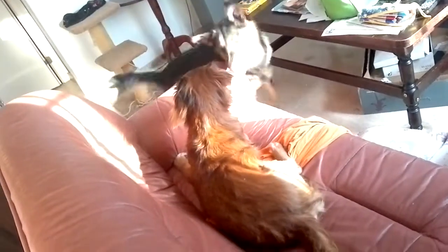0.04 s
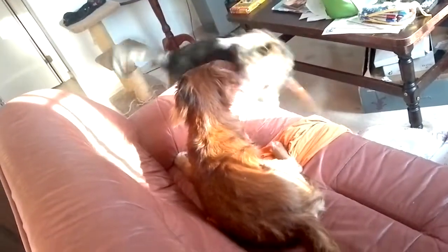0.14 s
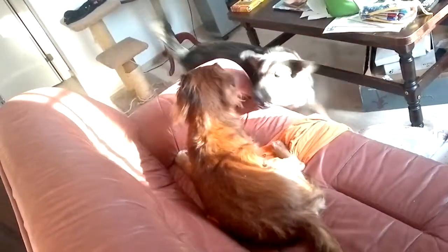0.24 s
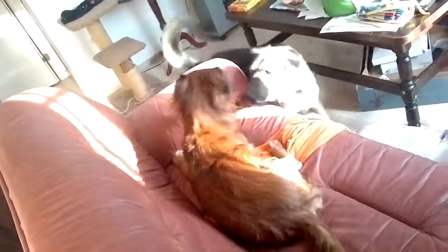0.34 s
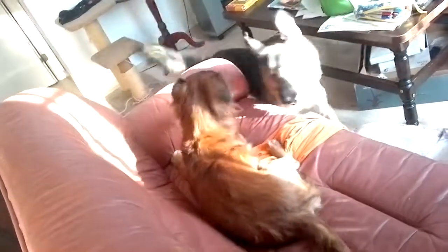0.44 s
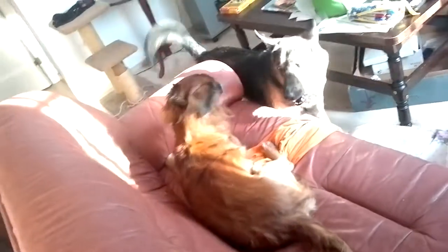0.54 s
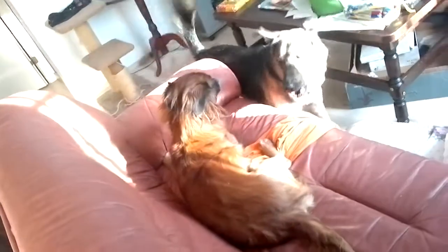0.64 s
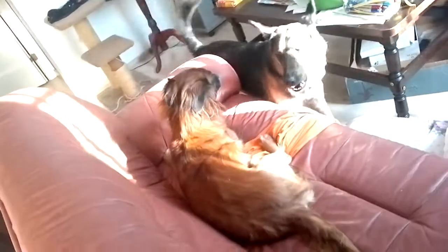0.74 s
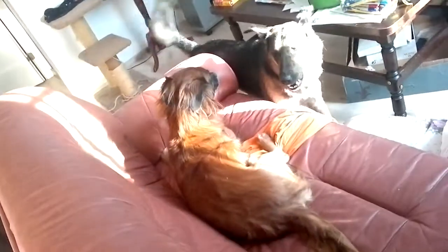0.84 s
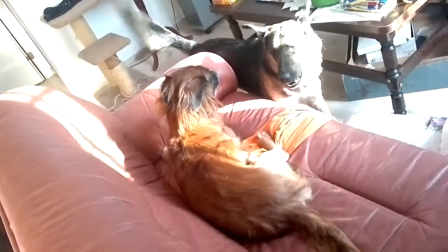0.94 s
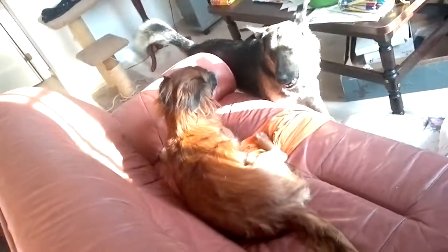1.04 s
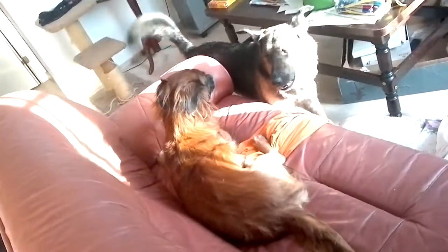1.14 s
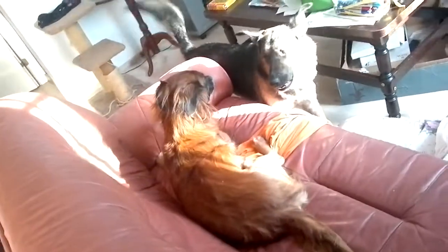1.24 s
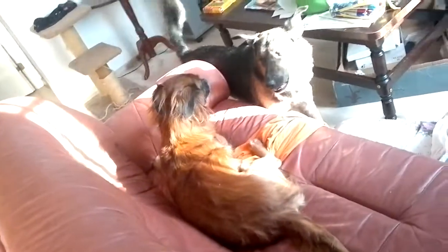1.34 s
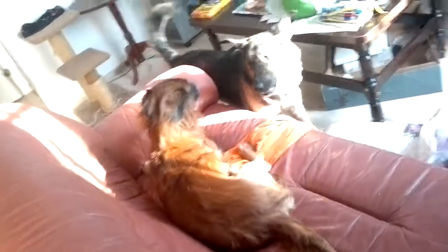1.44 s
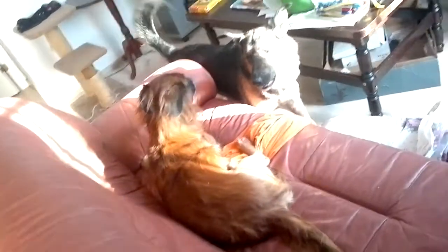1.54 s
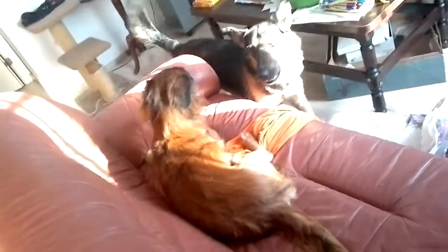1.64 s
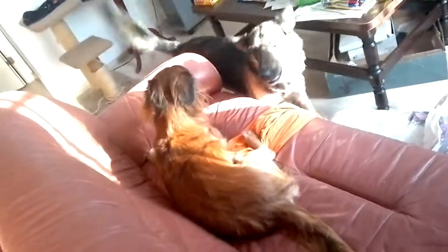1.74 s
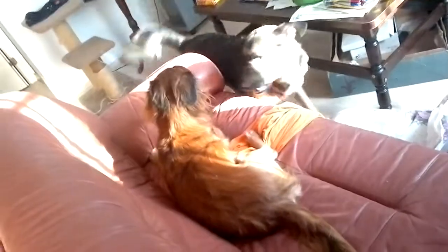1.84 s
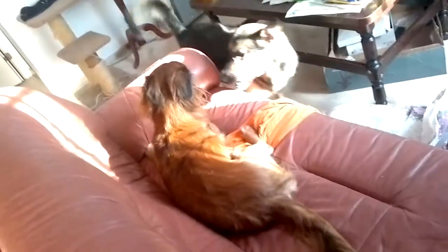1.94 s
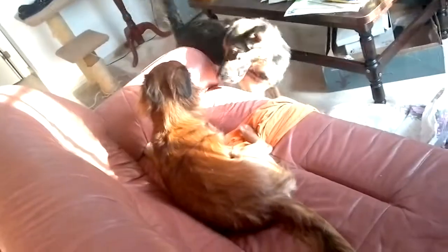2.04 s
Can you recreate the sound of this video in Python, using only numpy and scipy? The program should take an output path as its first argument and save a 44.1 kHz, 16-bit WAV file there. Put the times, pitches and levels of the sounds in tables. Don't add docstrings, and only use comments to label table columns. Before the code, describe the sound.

Single rough dog bark indoors, followed by faint claw ticks, a fluttering wet snort and breathy huff

```python
import sys
import numpy as np
from scipy import signal
from scipy.fft import rfft, irfft, next_fast_len
from scipy.io import wavfile
from scipy.ndimage import uniform_filter1d, minimum_filter1d, map_coordinates

SR = 44100
rng = np.random.default_rng(int(sys.argv[2]) if len(sys.argv) > 2 else 0)


def volts_from_decibels(level):
    exponent = np.asarray(level, float) / 20
    return 10 ** exponent


def wrap_up_sound(samples):
    columns = np.atleast_2d(samples).T
    tamed = np.clip(columns, -1, 1)
    steps = np.round(tamed * 32767).astype(np.int16)
    wavfile.write(sys.argv[1], SR, steps)


N = 92610


def unit(x):
    return x / np.sqrt(np.mean(x ** 2) + 1e-20)


def along(points, hz):
    f, value = np.transpose(points)
    return np.interp(np.log(hz + 1), np.log(f + 1), value)


def curves(rows):
    s, *columns = np.transpose(rows)
    return [np.interp(np.arange(N) / SR, s, column) for column in columns]


def inside(rows):
    t = np.arange(N) / SR
    gate = 1. * (t > rows[0][0]) * (t < rows[-1][0])
    return uniform_filter1d(gate, size=200)


def wobble(rate):
    knots = rng.standard_normal(int(N * rate / SR) + 4)
    return map_coordinates(knots, [np.arange(N) * rate / SR])


def filtered(x, response):
    m = next_fast_len(N + SR // 2)
    return irfft(rfft(x, m) * response(np.fft.rfftfreq(m, 1 / SR)), m)[..., :N]


def tract(x, peaks):
    def response(f):
        total = 0
        for k, (centre, width, db) in enumerate(peaks):
            damping = 1j * f * width
            total = total + (-1) ** k * volts_from_decibels(db) * damping / (centre ** 2 - f ** 2 + damping)
        return total
    return filtered(x, response)


def dull(x, top_hz):
    return filtered(x, lambda hz: 1 / (1 + 1j * hz / top_hz) / (1 + (hz / top_hz) ** 6))


def tone(rows, jitter):
    pitch, level_db = curves(rows)
    phase = 2 * np.pi * np.cumsum(pitch * (1 + jitter * wobble(150))) / SR
    return np.sin(phase) * volts_from_decibels(level_db + 0.46 * wobble(90)) * inside(rows)


def air(rows, peaks, rough_db):
    flow = volts_from_decibels(curves(rows)[0] + rough_db * wobble(50))
    return unit(tract(rng.standard_normal(N), peaks)) * flow * inside(rows)


def widen(pair):
    # f/Hz, left-right likeness (0-1)
    alike = [(40, 0.41), (200, 0.37), (1000, 0.64), (2000, 0.008), (5000, 0.011)]

    def weights(hz):
        angle = np.arccos(along(alike, hz)) / 2
        return np.array([np.cos(angle), np.sin(angle)])
    mid, side = filtered(pair, weights)
    return np.array([mid + side, mid - side])


def room(x, wet_db):
    # f/Hz, t60/s
    decay = [(60, 0.31), (200, 0.64), (450, 0.46), (1000, 0.45), (1800, 0.43), (3500, 0.48), (8000, 0.27)]
    shift_s, scatter = 0.05, 1.1
    turn = np.pi / 2 * np.arange(N) / SR / shift_s + scatter * wobble(90)
    hz, t, z = signal.stft(rng.standard_normal((2, 2, SR)), SR, nperseg=256)
    tails = signal.istft(z * volts_from_decibels(-60 * t / along(decay, hz)[:, None]), SR, nperseg=256)[1]
    tails = tails / np.linalg.norm(tails[0, 0])
    parts = x * np.array([np.cos(turn), np.sin(turn)])
    parts = np.pad(parts, ((0, 0), (200, 0)))
    wet = signal.fftconvolve(parts[:, None], tails, axes=2).sum(0)[:, :N]
    return x + volts_from_decibels(wet_db) * widen(wet)


def bark():
    # t/s, pitch f/Hz, effort level/dB, roughness (0-1), mouth opening (0-1)
    voice = [
        (0.194, 559.6, -40.5, 0.29, 0),
        (0.212, 570.7, -7.5, 0.57, 0.65),
        (0.232, 526.4, -5.5, 0, 0.64),
        (0.296, 492.7, -13, 0, 0.3),
        (0.306, 465.2, -14, 0.4, 0.4),
        (0.336, 490.2, -12.5, 0.4, 0.8),
        (0.355, 476, -24.5, .5, .5),
        (0.392, 501, -25.5, 0.5, 0.5),
    ]
    # f/Hz, width/Hz, level/dB
    throat_start = [(484, 730, -10), (1060, 208, 6), (1620, 160, -6.5), (2460, 130, -30), (2963, 680, -29)]
    throat_end = [(445, 200, -12), (1036, 54, -6.5), (1515, 140, -10), (1760, 120, -5), (2490, 270, -15.5),
                  (3500, 170, -46.5)]
    # f/Hz, width/Hz, level/dB
    hoarse_peaks = [(154, 80, -14.5), (254, 120, -10), (323.7, 130, -2.5), (439, 140, 3.5), (700, 200, 0.5),
                    (1197, 120, -4), (1456, 570, -11)]
    jitter, shimmer_db, halving = 0.045, 2, 0.12
    bark_db, hoarse_db, chest_db = -0.5, -7.5, -31
    pitch, effort_db, rough, opening = curves(voice)
    cycles = np.cumsum(pitch * (1 + jitter * wobble(220))) / SR
    pulses = sum(np.cos(2 * np.pi * k * cycles) for k in range(1, 19))
    pulses = pulses * (1 + halving * np.cos(np.pi * cycles))
    pulses = unit(pulses * volts_from_decibels(shimmer_db * wobble(120)))
    breath = unit(rng.standard_normal(N) * (1 + np.cos(2 * np.pi * cycles)))
    source = np.sqrt(1 - rough) * pulses + np.sqrt(rough) * breath
    effort = volts_from_decibels(effort_db) * inside(voice)
    drive = source * volts_from_decibels(bark_db) * effort / np.std(tract(source, throat_start))
    hoarse = unit(dull(tract(breath, hoarse_peaks), 1800)) * volts_from_decibels(hoarse_db) * effort
    chest = unit(tract(rng.standard_normal(N), [(57.4, 40, 0.5), (144, 30, 2.5)])) * volts_from_decibels(chest_db) * effort
    throat = tract(drive * (1 - opening), throat_start) + tract(drive * opening, throat_end)
    return throat + chest + hoarse


def larynx():
    # t/s, f/Hz, level/dB
    hoot = [
        (0.207, 565, -14.5),
        (0.222, 530, -4),
        (0.243, 405.2, -15.5),
        (0.262, 492.6, -9),
        (0.285, 475.2, -9),
        (0.3, 422, -16.5),
        (0.325, 474.2, -9.5),
        (0.352, 499, -15),
        (0.392, 472, -25),
    ]
    # t/s, f/Hz, level/dB
    squeak = [
        (.285, 1903, -32),
        (.294, 1793, -14),
        (.308, 1725, -14),
        (.345, 1694, -26.5),
        (.375, 1780, -45.5),
    ]
    t = np.clip(np.arange(N) / SR - 0.205, 0, None)
    pop_level = volts_from_decibels(-12.5 - 60 * t / 0.065) * (1 - np.exp(-t / 0.0035))
    burst = tract(rng.standard_normal(N), [(176, 180, -4.0), (412, 640, 0.0), (670, 300, -2.5)])
    pop = pop_level * unit(dull(burst, 980))
    return volts_from_decibels(-1.0) * tone(hoot, 0.03) + tone(squeak, 0.022) + pop


def rasp():
    # t/s, level/dB
    flow = [
        (.1, -80.5),
        (.16, -69),
        (.2, -68.5),
        (.212, -55),
        (.228, -55),
        (.24, -43),
        (.3, -46.5),
        (.35, -50),
        (.42, -63),
    ]
    # f/Hz, width/Hz, level/dB
    teeth = [(3000, 700, 3), (3590, 600, 2.5), (4932, 600, 1.5), (6205, 800, -1), (7900, 1300, -9),
             (11340, 500, -26)]
    return volts_from_decibels(-1.5) * air(flow, teeth, rough_db=2.5)


def breaths():
    # t/s, level/dB
    intake = [
        (0, -60.5),
        (.07, -67.5),
        (.085, -57),
        (.13, -58.5),
        (.19, -52),
        (.21, -79.5),
    ]
    huff_flow = [
        (1.76, -89.5),
        (1.785, -58),
        (1.845, -35),
        (1.875, -29),
        (1.92, -35),
        (1.95, -40),
        (1.98, -51.5),
        (2.045, -59),
        (2.065, -85),
    ]
    sniff = [
        (1.985, -72.5),
        (2.01, -59.5),
        (2.04, -66),
        (2.07, -83.5),
    ]
    # t/s, opening (0-1)
    jaw = [
        (1.84, 1),
        (1.875, .1),
        (1.93, 0),
        (1.96, 0.02),
        (2.0, 0.02),
    ]
    # f/Hz, width/Hz, level/dB
    mouth_narrow = [(270, 29, -8), (494, 57, -5), (676, 172, -5.5), (1049, 110, 2.5), (1430, 590, -13.5),
                    (2320, 520, -16.5), (2780, 295, -17.5), (4530, 3400, -42)]
    mouth_wide = [(285, 45, -16.5), (515, 69, -8), (742, 177, -2.5), (1170, 111, 1.5)]
    nose = [(110, 140, 3), (503, 1700, -3.5), (1100, 83, 7), (1622, 160, -10.5), (2570, 3000, -17.5),
            (5000, 4000, -24)]
    nostril = [(3450, 1200, -3.5), (4960, 470, 0.5), (6400, 1200, -5)]
    lips = [(1487, 240, 9), (2290, 1160, -10.5), (3840, 416, -18)]
    # t/s, f/Hz, level/dB
    whistle = [
        (1.85, 1060, -52.5),
        (1.878, 1032, -47),
        (1.895, 1032, -49.5),
        (1.912, 1048, -35),
        (1.928, 1060, -39),
        (1.945, 1086, -38.5),
        (1.97, 1036, -44.5),
        (2.04, 1047, -49.5),
        (2.065, 1066, -66),
    ]
    huff_hz, voiced_share, jitter = 522, 0.08, 0.045
    flutter_hz, flutter_peak_s, flutter_depth_db = 31.5, 1.878, 2.5
    lips_part_s, parting_s = 1.84, 0.04
    t = np.arange(N) / SR
    flutter_db = flutter_depth_db * np.cos(2 * np.pi * flutter_hz * (t - flutter_peak_s)) + 2.0 * wobble(60)
    cycles = np.cumsum(huff_hz * (1 + jitter * wobble(100))) / SR
    voice = unit(sum(np.cos(2 * np.pi * k * cycles) for k in range(1, 7)))
    source = np.sqrt(voiced_share) * voice + np.sqrt(1 - voiced_share) * rng.standard_normal(N)
    fluttering = source * volts_from_decibels(flutter_db)
    wide = curves(jaw)[0]
    mouth = tract(fluttering * (1 - wide), mouth_narrow[:4]) + tract(fluttering * wide, mouth_wide)
    mouth = unit(mouth + tract(source, mouth_narrow[4:]))
    parted = np.clip((t - lips_part_s) / parting_s + 1, 0, 1)
    huff = parted * mouth + (1 - parted) * unit(tract(rng.standard_normal(N), lips))
    huff = huff * volts_from_decibels(curves(huff_flow)[0] + 1.0) * inside(huff_flow)
    sniffing = air(sniff, nostril + lips, rough_db=2)
    return huff + air(intake, nose, rough_db=1.5) + sniffing + tone(whistle, 0.03)


def snort():
    # t/s, peak level/dB, mouth pitch f/Hz, ring t60/s, wet smack level/dB
    flaps = [
        (1.553, -27, 1040, 0.013, -41),
        (1.565, -22.5, 1060, 0.024, -40),
        (1.574, -19, 1022, 0.026, -38.5),
        (1.582, -20.5, 593, 0.014, -48),
        (1.589, -17, 936, 0.02, -27),
        (1.602, -15, 874, 0.0077, -34),
        (1.616, -13.5, 765, 0.034, -30),
        (1.633, -22, 710, 0.02, -38.5),
        (1.647, -19, 533.5, 0.024, -44.5),
        (1.696, -44.5, 460, 0.051, -60),
    ]
    # f/Hz, level/dB, t60/s
    overtones = [(3173, 0.5, 0.018), (4596, -4, .015), (8500, -16.5, .008)]
    # t/s, peak level/dB, rise t60/s
    squeezes = [
        (1.565, -47.5, 0.033),
        (1.588, -37.5, .04),
        (1.615, -49, 0.054),
    ]
    # f/Hz, level/dB per Hz
    spit_spectrum = [(40, 1.5), (140, 1.5), (760, 3), (1600, -24.5), (3000, -25), (5000, -26), (7000, -47),
                     (12000, -69)]
    # t/s, level/dB
    seep = [
        (1.5, -81.5),
        (1.55, -71.5),
        (1.6, -64),
        (1.65, -59),
        (1.69, -72),
        (1.72, -95.5),
    ]
    cheek_hz, cheek_db, cheek_t60 = 125, -11.5, 0.041
    spit_db, puff_t60, smack_db, smack_t60 = -29, 0.11, -7.5, 0.0092
    rings, puffs, fizz = np.zeros((3, N + SR))
    t = np.arange(SR // 8) / SR
    for s, db, hz, t60, wet_db in flaps:
        ring = np.sin(2 * np.pi * hz * t) * volts_from_decibels(db - 60 * t / t60)
        ring = ring + np.sin(2 * np.pi * cheek_hz * t) * volts_from_decibels(db + cheek_db - 60 * t / cheek_t60)
        for f, over_db, over_t60 in overtones:
            level = volts_from_decibels(wet_db + over_db + 2 * rng.normal() - 60 * t / over_t60)
            ring = ring + level * np.sin(2 * np.pi * f * rng.normal(1, 0.037) * t)
        flap = slice(round(s * SR), round(s * SR) + len(t))
        rings[flap] += ring * (1 - np.exp(-t / 0.0006))
        puffs[flap] += volts_from_decibels(0.5 * db - 60 * t / puff_t60)
        fizz[flap] += volts_from_decibels(wet_db + smack_db - 60 * t / smack_t60)
    for s, db, rise_t60 in squeezes:
        fizz[:round(s * SR)][-len(t):] += volts_from_decibels(db - 60 * t / rise_t60)[::-1]
    spit = unit(filtered(rng.standard_normal(N), lambda hz: volts_from_decibels(along(spit_spectrum, hz))))
    smack_peaks = [(3120, 820, 0.5), (5050, 810, 1.0), (8570, 3000, -5), (11400, 1200, -9)]
    smack = unit(tract(rng.standard_normal(N), smack_peaks)) * volts_from_decibels(2.3 * wobble(900))
    seeping = air(seep, [(2670, 770, -4), (5000, 550, -1)], rough_db=1.0)
    return rings[:N] + volts_from_decibels(spit_db) * puffs[:N] * spit + fizz[:N] * smack + seeping


def claws():
    # t/s, peak level/dB, f/Hz
    ticks = [
        (1.358, -56.5, 8500),
        (1.358, -67.5, 12030),
        (1.376, -60, 3000),
        (1.424, -57.5, 11550),
        (1.436, -49.5, 1684),
        (1.455, -59.5, 740),
        (.112, -49, 600),
    ]
    # t/s, level/dB
    rustle = [
        (1.33, -90.5),
        (1.37, -84),
        (1.41, -86),
        (1.445, -68.5),
        (1.48, -85),
        (1.54, -70),
    ]
    # f/Hz, width/Hz, level/dB
    leather = [(700, 600, 0), (1600, 1180, -1), (7000, 1200, -8)]
    out, t = np.zeros(N + SR), np.arange(SR // 20) / SR
    for s, db, hz in ticks:
        ring = np.sin(2 * np.pi * hz * t) * (1 - np.exp(-t * hz))
        scrape = hz / 30000 * rng.standard_normal(len(t))
        fall = volts_from_decibels(db + 7.5 - 60 * t * hz / 12)
        out[round(s * SR):][:len(t)] += fall * (ring + scrape)
    return out[:N] + air(rustle, leather, rough_db=1) * volts_from_decibels(2.6 * wobble(300))


def gusts():
    # t/s, level/dB
    flow = [
        (.2, -70.5),
        (.215, -41.5),
        (.25, -54),
        (.31, -42),
        (.37, -71),
        (1.54, -88.5),
        (1.58, -56),
        (1.7, -65),
        (1.76, -88.5),
    ]
    return dull(rng.standard_normal((2, N)), 79) * volts_from_decibels(curves(flow)[0] + 23.5) * inside(flow)


def background():
    # t/s, level/dB
    gain = [
        (0, 5.5),
        (.2, 14.5),
        (.5, -3.5),
        (.92, -3),
        (1.15, 1),
        (1.5, 10),
        (1.75, 10),
        (2.1, 15.5),
    ]
    # f/Hz, level/dB rms
    partials = [(48.4, -90), (145.3, -86.5), (193.8, -89), (250, -88), (290.7, -78.5), (393.0, -86.5),
                (436.0, -92), (484.5, -95.5)]
    # f/Hz, level/dB per Hz
    air_spectrum = [(20, -23.5), (50, -8), (110, -10.5), (280, -11), (460, -19.5), (1200, -25), (3000, -34),
                    (15000, -39.5)]
    air_db, hiss_db, waver_db = -77.5, -94, 2
    hum_follows = 0.75
    t, gain_db = np.arange(N) / SR, curves(gain)[0]
    hum = 0
    for hz, db in partials:
        phase = 2 * np.pi * (hz * t + rng.random() + 0.21 * wobble(34))
        hum = hum + volts_from_decibels(db + 4.5 + waver_db * wobble(1.3)) * np.sin(phase)
    hush = filtered(rng.standard_normal((2, N)), lambda hz: volts_from_decibels(along(air_spectrum, hz)))
    hush = unit(widen(hush)) * volts_from_decibels(air_db + 1.9 * wobble(51))
    hiss = volts_from_decibels(hiss_db) * rng.standard_normal((2, N))
    return volts_from_decibels(hum_follows * gain_db) * hum + volts_from_decibels(gain_db) * hush + hiss


def scene():
    # f/Hz, half left-right level/dB
    left_far = [(300, 0.5), (1000, 0.5), (3000, 3.5), (9000, -1)]
    left_near = [(300, 0), (1000, 0.8), (3000, -1), (9000, -5)]
    # f/Hz, phase by which left leads/rad
    lead = [(100, 1), (1000, -0.49), (2300, -1), (8000, -1.6)]

    def ports(left):
        def response(hz):
            left_gain = volts_from_decibels(along(left, hz)) * np.exp(0.5j * along(lead, hz))
            return left_gain ** np.array([[1], [-1]])
        return response
    dogs = room(dull(bark() + larynx(), 4000), wet_db=-8)
    dogs = dogs + room(dull(breaths(), 7620), wet_db=-16.5)
    dogs = dogs + room(dull(rasp(), 9500), wet_db=2.5)
    near = room(dull(snort(), 11240) + claws(), wet_db=-34.5)
    return filtered(dogs, ports(left_far)) + filtered(near, ports(left_near)) + background() + gusts()


def roll_off(x):
    return signal.sosfilt(signal.butter(12, 15730, fs=SR, output="sos"), x)


def record(dry):
    ceiling, whine_hz, whine_db = 0.84, 14990, -60
    needed = np.minimum(1, ceiling / (np.abs(dry).max(0) + 1e-9))
    held = dry * uniform_filter1d(minimum_filter1d(needed, size=500), size=400)
    loudness = uniform_filter1d(np.abs(dry).mean(0), size=600)
    phase = 2 * np.pi * whine_hz * np.arange(N) / SR + 0.6 * wobble(40)
    whine = volts_from_decibels(whine_db) * loudness * np.sin(phase)
    return roll_off(held + whine)


dry = scene()
out = record(dry)
wrap_up_sound(out)
```